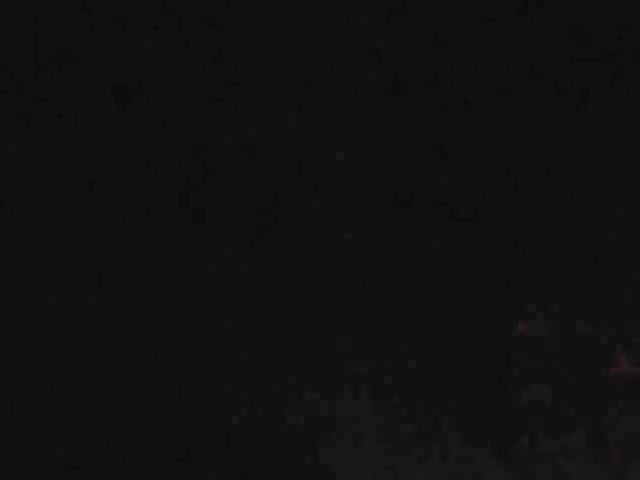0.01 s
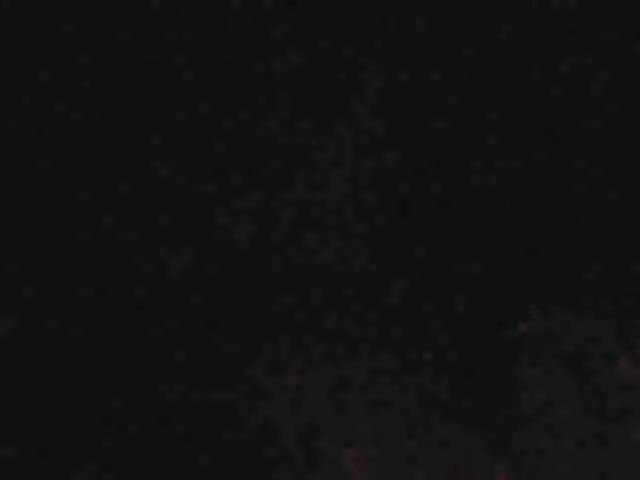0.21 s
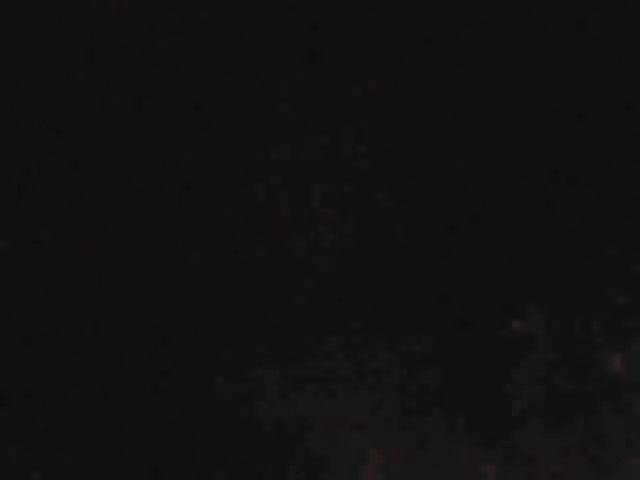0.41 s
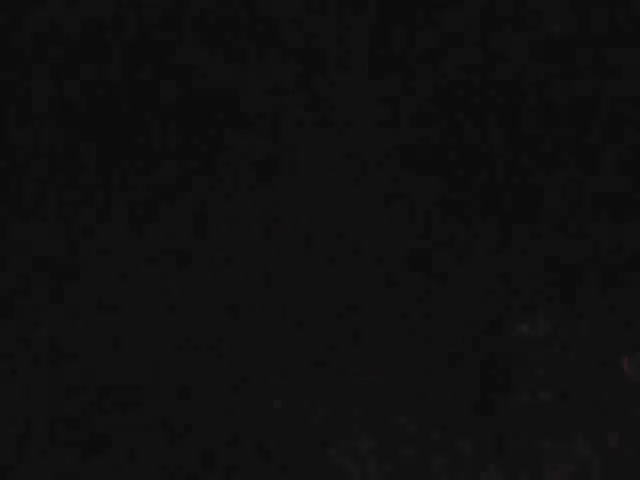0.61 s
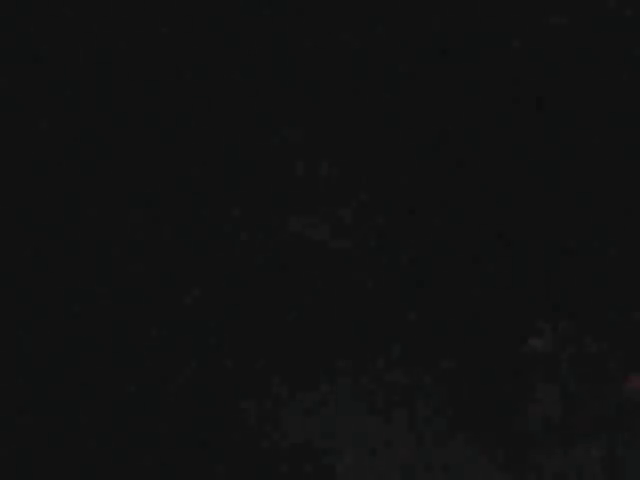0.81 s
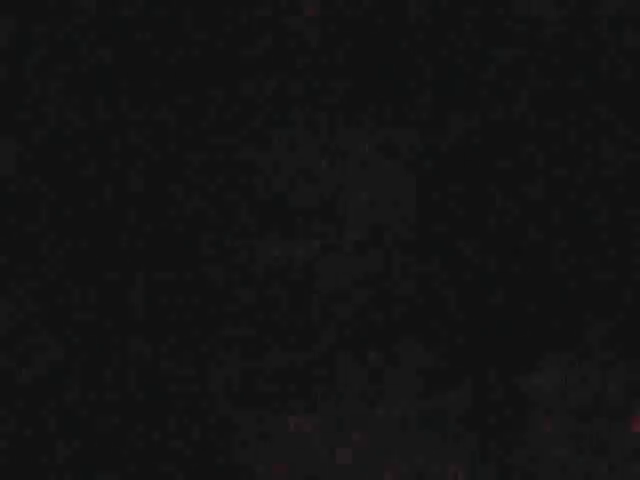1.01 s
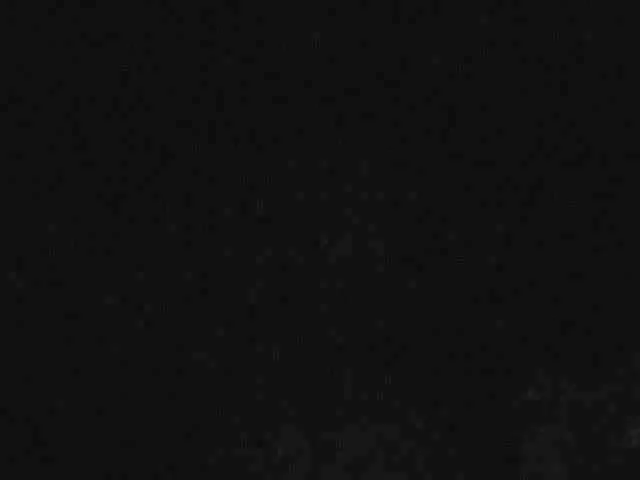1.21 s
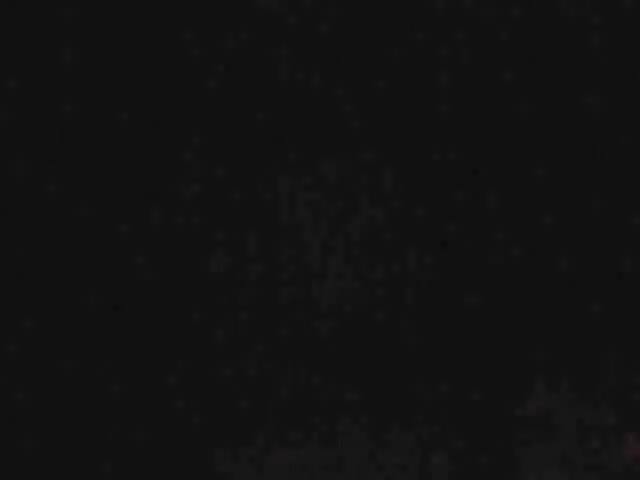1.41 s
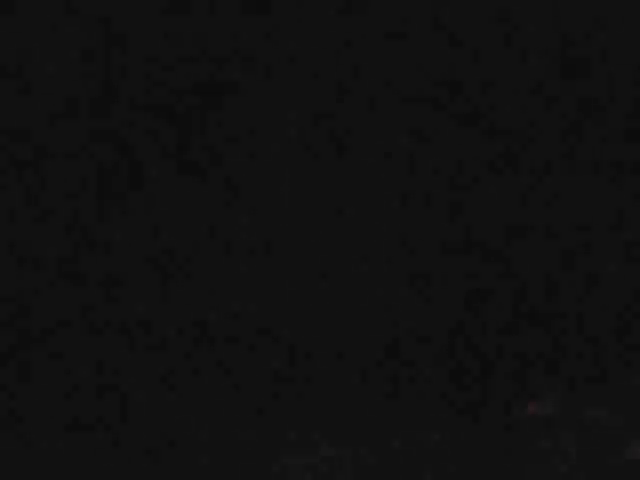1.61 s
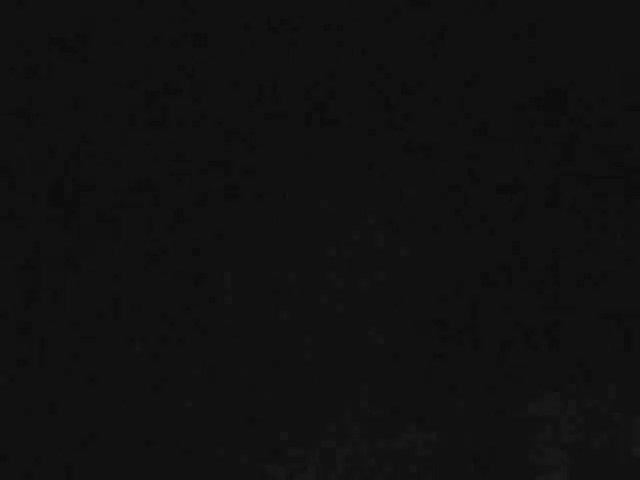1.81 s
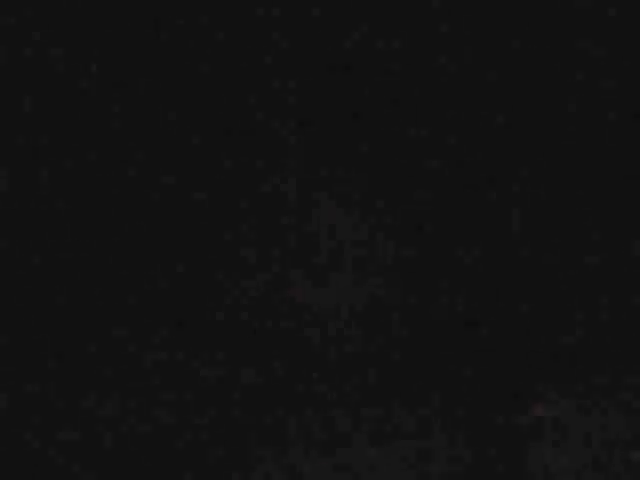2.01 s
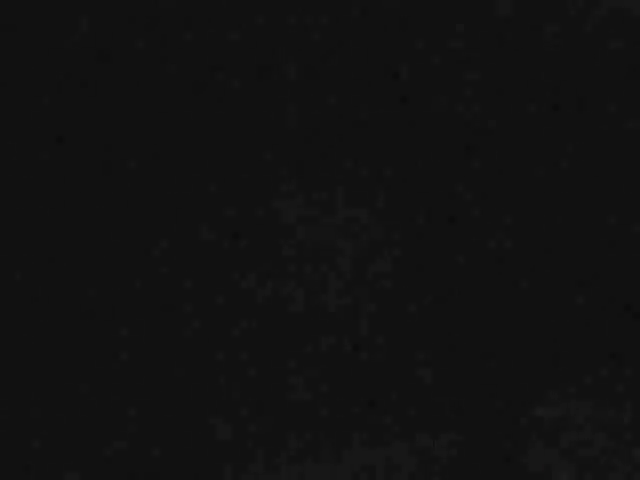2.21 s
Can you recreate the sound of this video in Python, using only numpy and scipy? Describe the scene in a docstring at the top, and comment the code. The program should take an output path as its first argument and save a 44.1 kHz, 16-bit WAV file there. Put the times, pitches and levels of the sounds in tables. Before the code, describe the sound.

In a quiet walled yard at night, an animal screeches long and raspy, sagging in pitch to a faint moan, barks once breathily, then yelps twice; short wall echoes, background hiss, coarse lo-fi microphone sound.

```python
"""Animal screech in a night yard

A quiet walled yard at night, over rumble and hiss: an animal gives one long falling screech trailing into
a low moan, a short harsh bark, then two softer yelps. Each call is a train of glottal pulses mixed with
breath noise, shaped by a closing mouth; it reaches the microphone direct and as echoes off the walls.
A simple recorder samples slowly, so the treble is mirrored above half its sampling rate."""
import sys
import numpy as np
from scipy import signal
from scipy.fft import rfft, irfft, next_fast_len
from scipy.io import wavfile
from scipy.ndimage import uniform_filter1d

SR = 44100
rng = np.random.default_rng(int(sys.argv[2]) if len(sys.argv) > 2 else 0)


def to_wav(sig):
    """Store sig (one row per channel, or 1-D mono) as 16-bit WAV at the path in sys.argv[1].

    Samples outside -1..1 are clipped; the rate is SR.
    """
    pcm = np.clip(np.atleast_2d(sig), -1, 1) * 32767
    pcm = np.round(pcm).astype(np.int16)
    wavfile.write(sys.argv[1], SR, pcm.T)  # frames by channels


N = 99225  # samples, 2.25 s


def from_db(db):
    """dB to gain."""
    return 10 ** (np.asarray(db) / 20)


def rms_one(x):
    """Scale to rms 1."""
    return x / np.sqrt(np.mean(x ** 2) + 1e-20)


def colour(x, points):
    """Filter by a spectrum of (frequency [Hz], level [dB]) points, joined on a log frequency axis."""
    size = next_fast_len(len(x) + 2048)
    hz, db = np.transpose(points)
    grid = np.maximum(np.arange(size // 2 + 1) * SR / size, 1)
    gain = from_db(np.interp(np.log(grid), np.log(hz), db))
    return irfft(rfft(x, size) * gain, size)[:len(x)]


def drift(rate_hz, count):
    """Slow random wobble of rms 1: noise through two equal low-pass poles."""
    settle = 9000  # samples dropped while the filter settles
    r = np.exp(-2 * np.pi * rate_hz / SR)
    wobble = signal.lfilter([1], [1, -2 * r, r * r], rng.standard_normal(count + settle))
    return rms_one(wobble[settle:])


def ring(x, hz, t60):
    """A damped resonance that falls 60 dB in t60 seconds."""
    r = from_db(-60 / (t60 * SR))
    w = 2 * np.pi * hz / SR
    return signal.lfilter([0, np.sin(w)], [1, -2 * r * np.cos(w), r * r], x + 1e-18)


# Steady night rumble and hiss: (frequency [Hz], level [dB per Hz])
NIGHT_SPECTRUM = [(12, -40.5), (20, -13.5), (34, -20.5), (49, -9.5), (182, -20.5), (259, -18), (512, -29.5),
                  (922, -26), (1010, -33.5), (1370, -32.5), (1660, -27.5), (3360, -36.5), (5500, -49),
                  (7150, -77.5), (12100, -120)]
NIGHT_DB = -44.5
# Faint wavering hums: (start [s], end [s], frequency [Hz], level [dB], width [Hz])
HUMS = [(1.2, 2.3, 1027, -49, 35), (1.43, 1.58, 442, -53, 8.5)]
# Fading echo of an earlier call: (frequency [Hz], level [dB per Hz])
EARLIER_SPECTRUM = [(410, -30), (700, -5), (922, -7), (971, -17.5), (1290, 5), (1360, -15), (1920, -24.5),
                    (2600, 3), (3110, -20.5), (5500, -30), (7150, -59), (12100, -120)]
EARLIER_DB = -50  # at 0 s
YARD_T60_S = 0.93  # time for the yard's echoes to fall 60 dB


def night():
    """Night air of the yard: coloured noise, narrow resonant hums and an earlier call's decaying echo."""
    t = np.arange(N) / SR
    floor = from_db(NIGHT_DB) * rms_one(colour(rng.standard_normal(N), NIGHT_SPECTRUM))
    for start, end, hz, db, width_hz in HUMS:
        swell = np.clip(np.minimum(t - start, end - t) / 0.034, 0, 1)  # 34 ms ramps
        hum = rms_one(ring(rng.standard_normal(N), hz, 1.6 / width_hz))
        floor = floor + from_db(db) * swell * hum
    fading = from_db(EARLIER_DB - 60 * t / YARD_T60_S)
    return floor + fading * rms_one(colour(rng.standard_normal(N), EARLIER_SPECTRUM))


# Small dry ticks: (time [s], peak [dB], frequency [Hz], t60 [s])
TICKS = [(.012, -27, 3200, .005), (.595, -18, 3300, .005)]


def ticks():
    """Small dry clicks: single impulses, each ringing a short resonance."""
    out = np.zeros(N)
    for s, db, hz, t60 in TICKS:
        impulse = 1. * (np.arange(N) == int(s * SR))
        out = out + from_db(db) * ring(impulse, hz, t60)
    return out


# The walls return mostly the upper middle: (frequency [Hz], level [dB])
WALL_COLOUR = [(500, -5), (1200, 0), (2000, 2.5), (3200, 0.5), (4500, -2), (5600, -0.5)]
ECHO_DB, FIRST_ECHO_S = -3.5, 0.012


def yard(x):
    """Echoes off the yard walls: a dense scatter of random reflections that dies away."""
    t = np.arange(SR) / SR
    tail = rng.standard_normal(SR) * from_db(-60 * t / YARD_T60_S) * (t > FIRST_ECHO_S)
    tail = tail / np.sqrt(np.sum(tail ** 2))
    return from_db(ECHO_DB) * colour(signal.fftconvolve(x, tail)[:N], WALL_COLOUR)


# A thin squeak opens a call: (time [s], level [dB], frequency [Hz], fall [s])
SQUEAKS = [(.21, -35, 3810, .02), (1.193, -33.5, 3874, .06), (1.646, -39, 3290, .02)]
SQUEAK_RISE_S = 0.0027


def squeaks():
    """Short puffs of whistling breath: a sine and narrow noise that rise fast and decay exponentially."""
    t = np.arange(N) / SR
    out = np.zeros(N)
    for s, db, hz, fall_s in SQUEAKS:
        age = np.maximum(t - s, 0)
        breath = rms_one(ring(rng.standard_normal(N), hz, .005))
        whistle = np.sin(2 * np.pi * hz * age) + 0.7 * breath
        envelope = np.minimum(age / SQUEAK_RISE_S, 1) * np.exp(-age / fall_s)
        out = out + from_db(db) * envelope * whistle
    return out


# A rough throat resonance flares as the screech starts to sag: (time [s], frequency [Hz], level [dB])
FLARE = [(.6, 1690, -48), (.64, 1694, -26.5), (0.719, 1658, -27.5), (0.789, 1544, -28.5),
         (0.829, 1496, -47)]
FLARE_WIDTH_HZ = 90.


def flare():
    """A narrow band of breath noise gliding down: two random wobbles on a moving carrier."""
    s, hz, db = np.transpose(FLARE)
    t = np.arange(N) / SR
    phase = 2 * np.pi * np.cumsum(np.interp(t, s, hz)) / SR
    band = drift(FLARE_WIDTH_HZ, N) * np.cos(phase) + drift(FLARE_WIDTH_HZ, N) * np.sin(phase)
    return band * from_db(np.interp(t, s, db)) * (t > s[0]) * (t < s[-1])


# The animal's calls: (time [s], pitch [Hz], level [dB], breath noise share [0-1],
# half-pitch share [0-1], mouth [0 open - 1 closing])
SCREECH = [(.205, 561.6, -56, .4, .1, 0.25), (0.227, 573.7, -35.5, 0.92, 0.3, 0.13),
           (0.254, 575.2, -25, 0.57, 0.4, 0), (0.301, 567.3, -25, 0.24, 0.13, 0.11),
           (.38, 570.3, -21, 0.2, 0, 0.08), (0.501, 558, -21.5, 0.16, 0.17, 0.2),
           (.6, 556.5, -21.5, 0.1, .1, .2), (0.679, 530, -26, .45, .1, 0.61),
           (0.772, 505, -23.5, 0.4, 0.2, 0.67), (0.841, 485, -23, 0.2, 0, 1),
           (0.902, 454, -25.5, 0.3, 0, 0.52), (0.949, 437.2, -32, .4, 0.2, 0.63),
           (1.0, 414, -54.5, 0.6, 0, 0.86)]
BARK = [(1.18, 980.8, -47.5, .2, 0.14, 0), (1.204, 990.1, -32, .3, 0.2, 0),
        (1.243, 1023, -22, 0.72, 0.28, 0.11), (1.281, 942, -25.5, 0.59, 0.31, 0.88),
        (1.328, 831.4, -38.5, .6, .2, 0.87), (1.398, 769.5, -42, .4, .1, 1), (1.428, 700, -72.5, .4, .1, 1)]
YELP = [(1.64, 568.2, -64, .3, 0.11, 0.22), (1.66, 575, -39, 0.38, 0.09, .2),
        (1.685, 580.2, -31, 0.72, .1, 0.77), (1.719, 582, -28.5, 0.38, 0.071, 1),
        (1.76, 580.6, -32.5, 0.47, 0.085, 0.91), (1.799, 561, -38, 0.28, .1, 1),
        (1.83, 537, -37, .5, .1, 0.92)]
HIGH_YELP = [(1.8, 1673, -53, 0.28, .1, 0.34), (1.828, 1690, -31.5, 0.7, 0.092, 0.12),
             (1.861, 1636, -28, .3, .1, 0.031), (1.88, 1522, -33.5, .5, .1, 0.15),
             (1.9, 1294, -32, 0.49, .1, 0.37), (1.929, 972, -33.5, .8, 0.13, 1),
             (1.964, 772, -44, 0.39, .1, 1), (1.99, 703, -40, 0.44, 0.085, 1)]
MOAN = [(.92, 444.5, -53, .2, .1, 0), (0.962, 446.9, -39.5, .1, .05, 0.43),
        (1.0, 451, -38, .1, 0.045, 0.16), (1.063, 439.1, -40, 0.14, 0.058, 0.21),
        (1.09, 442.5, -39.5, 0.59, .1, 0.97), (1.139, 444, -34, 0.55, 0.3, 0.84),
        (1.19, 448.4, -37.5, 0.18, 0.11, 1), (1.22, 453, -63.5, 0.14, 0.12, 0.87)]
# Throat colour of the overtones, per call, mouth open then closing: (frequency [Hz], level [dB])
THROATS = [([(500, -40), (800, -29.5), (1130, -17), (1700, -12.5), (2260, -6), (2800, 2.5), (3400, -19),
           (4000, -13.5), (4500, -12.5), (5000, -19.5), (5600, -15.5)], [(500, -31.5), (750, -7.5),
           (900, -5.5), (1100, 3.5), (1400, -7.5), (1650, 9), (2000, -4), (2400, -2.5), (3000, -11),
           (4000, -7), (5600, -26.5)]), ([(500, -12), (1000, -2.5), (2000, -2.5), (3000, 3), (3900, 5.5),
           (5000, -12.5), (5600, -33)], [(500, -41.5), (750, 5), (1000, -9.5), (1900, -2.5), (3100, 4.5),
           (4000, -13.5), (5600, -22)]), ([(500, -46), (1100, -35), (1700, -17), (2800, -5.5), (3350, 30),
           (4000, 0), (5600, -26)], [(500, -33), (1100, -17), (1780, -10.5), (2350, -3), (2880, 5.5),
           (3500, -22), (4100, -9), (5600, -22)]), ([(500, -43), (1700, -20.5), (3350, -13.5), (5000, -23),
           (5600, -27.5)], [(500, -23.5), (800, -1), (1100, -10.5), (1400, -6), (2000, -16.5),
           (2800, -23.5), (3200, 1.5), (4000, -18.5), (5600, -32)]), ([(450, -26.5), (900, -9), (1350, -25),
           (2200, -22), (3200, -11), (5600, -41)], [(450, -32.5), (900, -5), (1350, -23.5), (1750, -7),
           (3200, -1.5), (5600, -37.5)])]
# Colour of the breath noise, per call, mouth open then closing: (frequency [Hz], level [dB per Hz])
BREATHS = [([(410, -75.5), (700, -52), (1120, -7), (1330, -29), (1660, -7.5), (1870, -19.5), (2200, -6),
           (2780, -0.5), (3030, -5), (5500, -17.5), (7150, -61.5), (12100, -120)], [(410, -75.5),
           (700, -47.5), (930, -32), (1020, -2.5), (1160, -5), (1350, -17.5), (1630, -7.5), (1990, -2),
           (2470, -0.5), (2690, -5.5), (2960, -7), (4320, -8), (5500, -32.5), (7150, -63.5),
           (12100, -120)]), ([(410, -61.5), (700, -43), (1010, -14.5), (1420, -13), (1840, -9.5),
           (2260, -9.5), (3900, -6.5), (5500, -16.5), (7150, -50), (12100, -120)], [(410, -66),
           (700, -35.5), (832, -10.5), (1440, -16), (1660, -4), (3010, -9.5), (4630, -12.5), (5500, -30),
           (7150, -62.5), (12100, -120)]), ([(410, -49.5), (700, -19), (1310, -21), (1780, -1.5),
           (2620, -24), (3360, -9), (5500, -25.5), (7150, -61), (12100, -120)], [(410, -60), (700, -46),
           (1060, -14.5), (1350, -32.5), (1790, 0), (2170, -12.5), (2810, -0.5), (5500, -19.5),
           (7150, -45.5), (12100, -120)]), ([(410, -57), (700, -42.5), (1640, -20), (3110, -4.5),
           (3420, 6.5), (3930, -18), (5500, -16.5), (7150, -52), (12100, -120)], [(410, -52), (700, -5),
           (915, -21.5), (1040, 1.5), (1380, -9.5), (1620, 2), (3190, -1.5), (5500, -32.5), (7150, -52),
           (12100, -120)]), ([(410, -67.5), (700, -30.5), (884, 6), (1230, -17), (3030, -18), (5500, -15.5),
           (7150, -50), (12100, -120)], [(410, -66.5), (700, -32.5), (884, -16), (1070, -12.5),
           (1690, -5.5), (5500, -20.5), (7150, -50), (12100, -120)])]
# Fast tremor of the folds, speeding up: (time [s], rate [Hz])
FLUTTER = [(.25, 54.4), (0.349, 55.1), (0.502, 62.2), (.65, 75.2)]
FLUTTER_PITCH, FLUTTER_DEPTH = .006, .7  # share of pitch, share of level
FLUTTER_FROM = 3.6  # overtone above which the level tremor sets in
JITTER, JITTER_HZ = .003, 40.  # random pitch wobble (share of pitch) and its speed
RASP = .008  # extra wobble, times breath share squared
SHIMMER_DB, SHIMMER_HZ = .75, 25.  # flicker of each overtone, per step up to the fourth
BREATH_GATE = 1  # how much the breath pulses with each cycle


def through_mouth(x, colours, mouth):
    """Blend the open and closing mouth colours, then even the level over 3000 samples."""
    shaped = (1 - mouth) * colour(x, colours[0]) + mouth * colour(x, colours[1])
    return shaped / np.sqrt(uniform_filter1d(shaped ** 2, size=3000) + 1e-12)


def call(rows, throat, breath_colour):
    """Glottal overtones and breath gated by each cycle, coloured by the mouth, then shaped in level."""
    s, *columns = np.transpose(rows)
    first, n = int(s[0] * SR), int((s[-1] - s[0]) * SR)
    t = (first + np.arange(n)) / SR
    hz, db, breath, half, mouth = [np.interp(t, s, c) for c in columns]
    breath, half, mouth = np.clip([breath, half, mouth], 0, 1)

    flutter_hz = np.interp(t, *np.transpose(FLUTTER)) * (1 + 0.2953 * drift(9.98, N)[:n])
    tremor = 2 * np.pi * np.cumsum(flutter_hz) / SR
    wobble = (JITTER + RASP * breath ** 2) * drift(JITTER_HZ, N)[:n]
    phase = 2 * np.pi * np.cumsum(hz * (1 + wobble + FLUTTER_PITCH * np.cos(tremor))) / SR

    tones = np.zeros(n)
    for k in range(1, 13):
        depth = FLUTTER_DEPTH * np.clip(k - FLUTTER_FROM, 0, 1)
        flutter = 1 - depth * np.cos(tremor + k)
        shimmer = from_db(np.minimum(k, 4) * SHIMMER_DB * drift(SHIMMER_HZ, N // 2)[:n])
        tones = tones + np.cos(k * phase + k * k) * flutter * shimmer
    tones = tones * (1 - half + 2 * half * np.cos(phase / 2))  # adds the half-pitch series
    noise = rng.standard_normal(N)[:n] * (1 + BREATH_GATE * np.cos(phase))

    throat = [points + [(5700, -70)] for points in throat]  # no overtones above the throat's range
    voice = np.sqrt(1 - breath) * through_mouth(tones, throat, mouth)
    voice = voice + np.sqrt(breath) * through_mouth(noise, breath_colour, mouth)
    fades = np.minimum(1, np.minimum(np.arange(n), n - np.arange(n)) / 200)
    out = np.zeros(N)
    out[first:first + n] = voice * from_db(db) * fades
    return out


def scene():
    """The animal, direct and echoed by the yard, over ticks and the night floor."""
    calls = (SCREECH, BARK, YELP, HIGH_YELP, MOAN)
    animal = sum(call(*c) for c in zip(calls, THROATS, BREATHS)) + squeaks() + flare()
    return (animal + yard(animal) + ticks() + night())[None]


# The recorder's smoothing filter: (frequency [Hz], level [dB])
SMOOTHING = [(4000, -1), (5000, 0), (5500, -5), (6000, -10), (6500, -24), (6900, -29), (7200, -32),
             (7600, -49)]
SAMPLING_HZ, STOP_HZ = 11025, 7380  # recorder's sampling rate, edge of the final cut's stop band
OFFSET, DITHER_DB = .0151, -95  # constant offset (full scale 1), level of white hiss


def record(dry):
    """Slow sampling mirrors the spectrum; a gentle filter only partly removes the mirror; the top is cut."""
    band = colour(dry[0], [(SAMPLING_HZ / 2, 0), (SAMPLING_HZ / 2 + 10, -80)])
    sampled = band * (1 + 2 * np.cos(2 * np.pi * SAMPLING_HZ * np.arange(N) / SR))
    top_cut = signal.cheby2(16, 60, STOP_HZ, fs=SR, output="sos")
    cut = signal.sosfilt(top_cut, colour(sampled, SMOOTHING))
    return (cut + OFFSET + from_db(DITHER_DB) * rng.standard_normal(N))[None]


dry = scene()
out = record(dry)
to_wav(out)
```